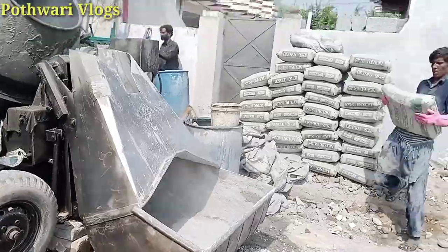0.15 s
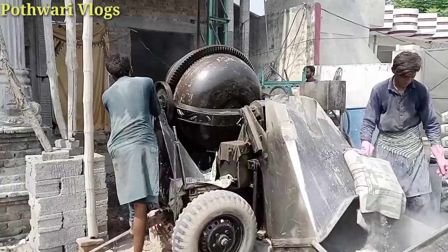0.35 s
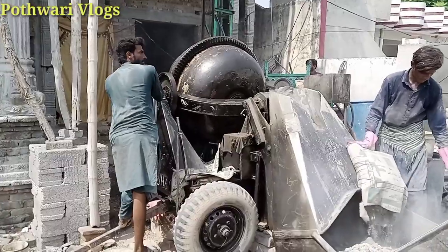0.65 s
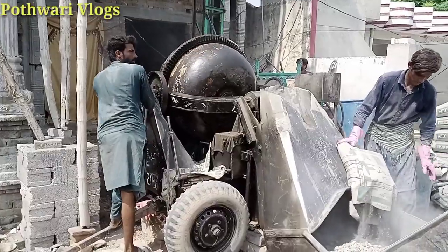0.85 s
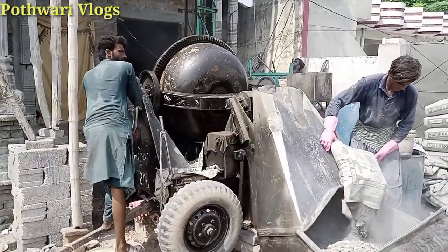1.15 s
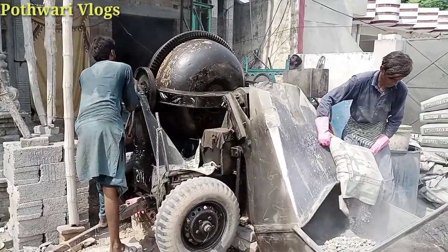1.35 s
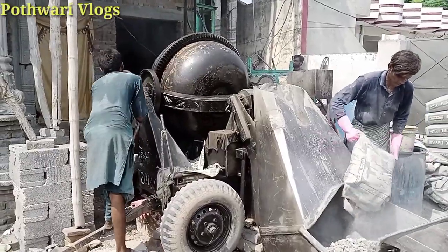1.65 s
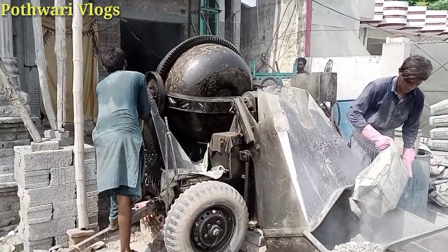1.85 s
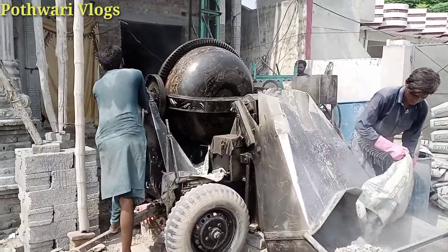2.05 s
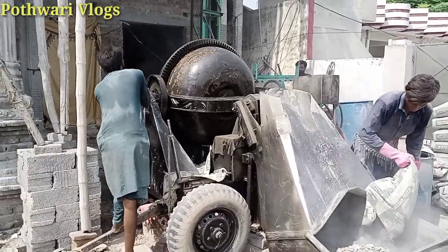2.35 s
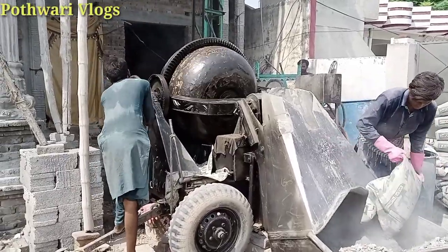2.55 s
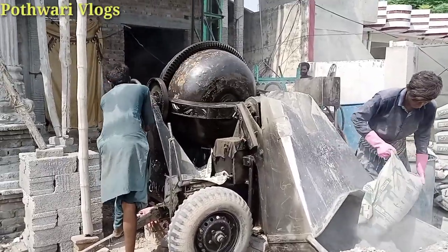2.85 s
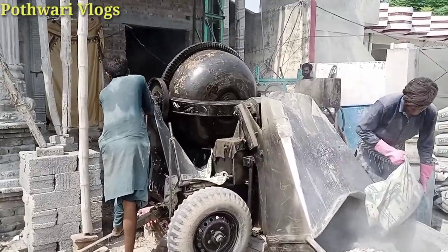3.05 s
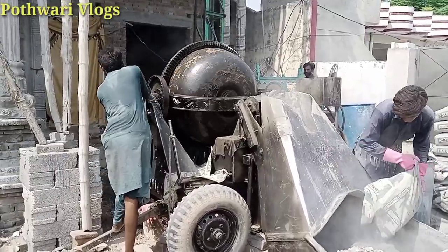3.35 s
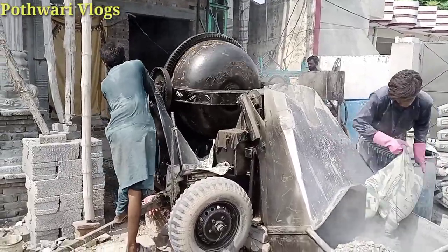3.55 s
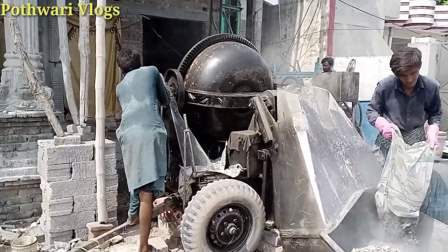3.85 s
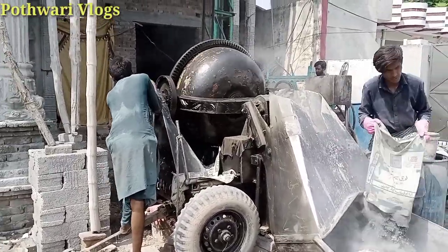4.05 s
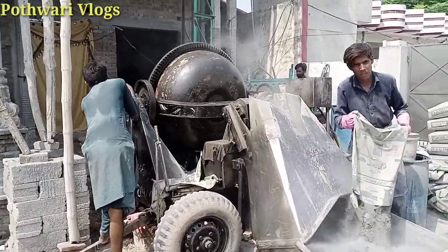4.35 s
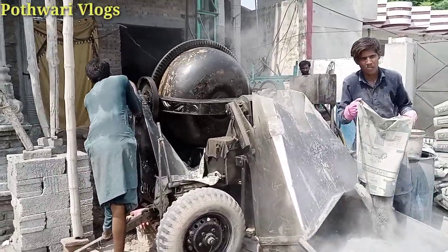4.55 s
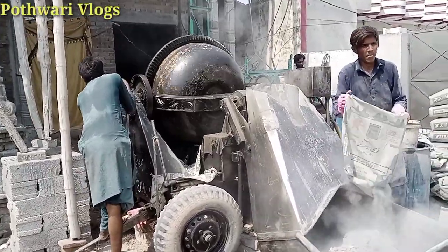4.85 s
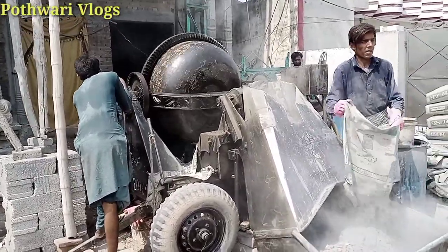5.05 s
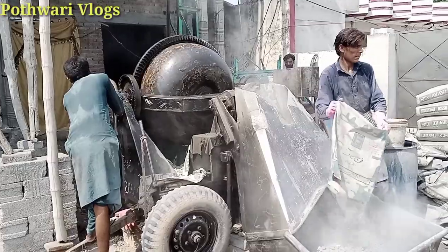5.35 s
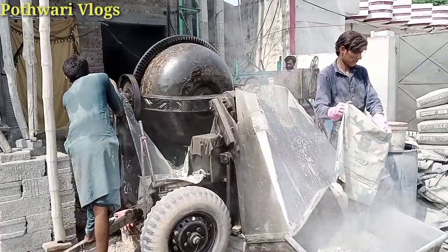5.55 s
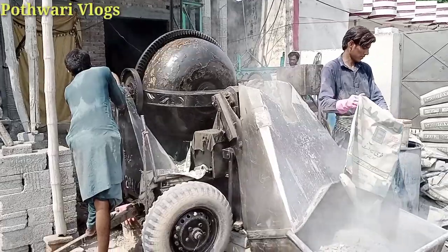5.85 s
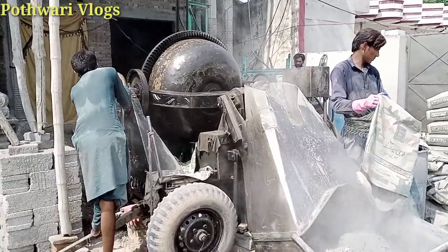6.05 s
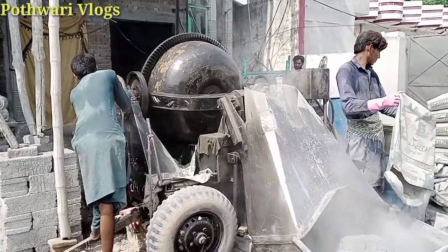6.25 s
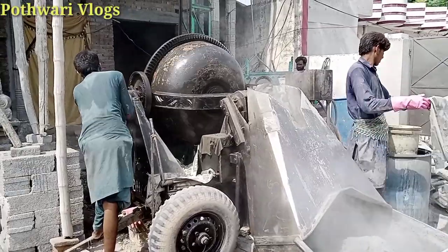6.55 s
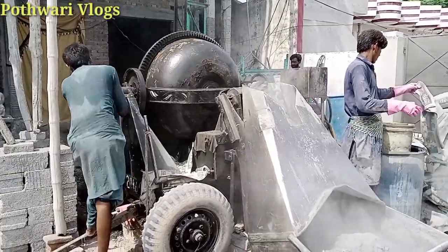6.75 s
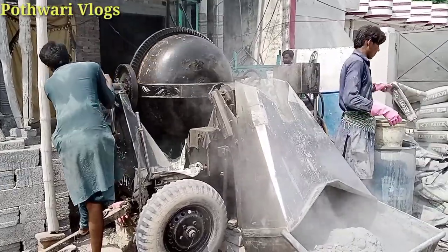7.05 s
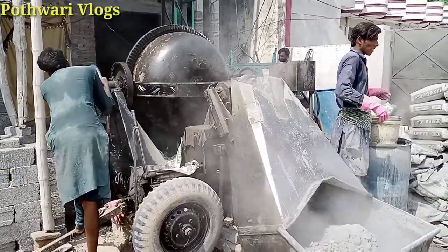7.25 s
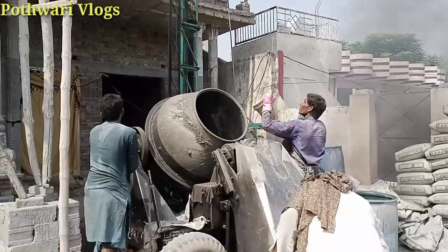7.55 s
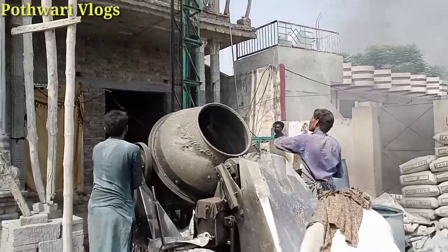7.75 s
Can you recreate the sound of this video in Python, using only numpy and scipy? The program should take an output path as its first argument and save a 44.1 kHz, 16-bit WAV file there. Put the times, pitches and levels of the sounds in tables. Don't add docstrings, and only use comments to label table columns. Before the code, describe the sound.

Steady clattering small diesel drives a concrete mixer at about ten beats a second; one load thumps into a steel hopper, and the view jumps closer at the end.

```python
import sys
import numpy as np
from scipy import signal
from scipy.fft import rfft, irfft
from scipy.io import wavfile
from scipy.ndimage import uniform_filter1d

SR = 44100
rng = np.random.default_rng(int(sys.argv[2]) if len(sys.argv) > 2 else 0)


def waveform_to_disk(signal):
    frames = np.transpose(np.atleast_2d(signal))
    scaled = np.clip(frames, -1, 1) * 32767
    samples = np.round(scaled).astype(np.int16)
    wavfile.write(sys.argv[1], SR, samples)


def rack_gain(trim_db):
    fader = np.asarray(trim_db, float)
    return 10 ** (fader / 20)


N = 348554

MOVES_S = (.41, 7.56)
# knock, treble, panel and thump level, all in dB.
POSITION_DB = [
    (-2.5, -4, 1.5, -3),
    (-1.5, 1.5, -3, 2),
    (2, 6.5, -9, 17.5),
]
# frequency in Hz, level in dB per Hz.
KNOCK_COLOUR = [(900, -21.5), (1200, -30), (1350, -5.5), (1900, -10.5), (2450, 0), (3200, -2), (3700, -5),
                (5200, -3), (7000, -3), (8000, -16), (10000, -27), (12000, -38.5), (13800, -40),
                (15000, -25)]


def rms_one(x):
    return x / np.sqrt(np.mean(x ** 2) + 1e-20)


def at_hz(points, hz):
    points_hz, points_db = np.transpose(points)
    return np.interp(np.log(hz), np.log(points_hz), points_db)


def coloured(x, spectrum):
    size = 8192
    bins_hz = np.maximum(np.arange(size // 2 + 1), 1) * SR / size
    cepstrum = irfft(np.log(rack_gain(at_hz(spectrum, bins_hz))))
    cepstrum[1:size // 2] *= 2
    cepstrum[size // 2 + 1:] = 0
    return signal.fftconvolve(x, irfft(np.exp(rfft(cepstrum))))[:N]


def drift(rate_hz):
    step = 40
    r = np.exp(-2 * np.pi * rate_hz * step / SR)
    settle = 2000
    slow = signal.lfilter([1], [1, -2 * r, r * r], rng.standard_normal(N // step + settle + 2))[settle:]
    return np.interp(np.arange(N) / step, np.arange(len(slow)), rms_one(slow))


def grains(per_s, spread_db):
    sizes = rack_gain(spread_db * np.minimum(rng.exponential(1, N), 4.0))
    sizes = sizes * rng.choice([-1, 1], N)
    return rms_one(sizes * (rng.random(N) < per_s / SR))


def clicks(seconds, sizes):
    out = np.full(N, 1e-18)
    out[np.clip((np.asarray(seconds) * SR).astype(int), 0, N - 1)] = sizes
    return out


def dying(x, t60_s):
    return signal.lfilter([1], [1, -rack_gain(-60 / (t60_s * SR))], x)


def swelling(x, rise_s):
    r = np.exp(-1 / (rise_s * SR))
    return signal.lfilter([1 - r], [1, -r], x)


def burst(x, t60_s, rise_s):
    return swelling(dying(x, t60_s), rise_s)


def ring(x, hz, width_hz):
    r = np.exp(-np.pi * width_hz / SR)
    w = 2 * np.pi * hz / SR
    return signal.lfilter([0, np.sin(w)], [1, -2 * r * np.cos(w), r * r], x)


def pings(seconds, hz, level_db, half_s):
    out, t = np.zeros(N + 800), np.arange(800) / SR
    bell = (t / half_s) ** 2 * np.exp(2 - 2 * t / half_s)
    for s, f, g in zip(np.maximum(seconds, 0), hz, rack_gain(level_db)):
        start = int(s * SR)
        out[start:start + len(t)] += g * bell * np.sin(2 * np.pi * f * t)
    return out[:N]


def band_of(x, order, low_hz, high_hz):
    return signal.sosfilt(signal.butter(order, [low_hz, high_hz], "band", fs=SR, output="sos"), x)


def gear(patchy_db):
    # frequency in Hz, level in dB per Hz.
    drum_colour = [(30, -38), (70, -9.5), (200, -7), (400, -11.5), (540, -18), (800, -8), (1150, -11.5),
                   (1350, -2), (2500, -0.5), (4000, -7), (7000, -11.5), (9000, -31.5), (12500, -50.5),
                   (15300, -36)]
    # time in seconds, level in dB, brightness in dB per octave.
    drum_run = [(0, -34, -4), (.4, -37, -5), (.6, -38.5, 1.5), (1.5, -37, -0.5), (2.2, -38, 0.5),
                (4, -38, 0), (5.5, -37, -0.5), (7.5, -37, -2), (7.6, -42.5, 10.5), (7.75, -39.5, 14.5),
                (7.9, -38.5, 13)]
    s, level_db, slope_db = np.transpose(drum_run)
    t = np.arange(N) / SR
    level_db, slope_db = np.interp(t, s, level_db), np.interp(t, s, slope_db)
    edges_hz = 30 * 2 ** np.arange(0, 9.1, 1 / 3)
    contacts = [rms_one(coloured(grains(9000, 2.6), drum_colour)) for k in range(2)]
    out = np.zeros(N)
    for k, (low_hz, high_hz) in enumerate(zip(edges_hz, edges_hz[1:])):
        band = band_of(contacts[k % 2], 2, low_hz, high_hz)
        octaves = np.clip(np.log2(low_hz / 2000), 0, 1.6)
        out += band * rack_gain(patchy_db * drift(14.1) + slope_db * octaves)
    return rack_gain(level_db) * out


def firings():
    # time in seconds, firings counted so far.
    pace = [(.012, 0), (.08, 1), (.292, 3), (.372, 4), (.4549, 5), (1.0589, 11), (1.6704, 17), (2.2889, 23),
            (2.9146, 29), (3.538, 35), (4.1604, 41), (4.787, 47), (5.4147, 53), (6.0366, 59), (6.6571, 65),
            (7.4855, 73), (7.5804, 74), (7.8535, 78)]
    # time in seconds, load in dB.
    load = [(.4, -3.5), (1.3, -2), (2.2, -0.5), (3.3, -0.36), (4.2, 0.58), (5.6, -0.5), (7.4, 0.16)]
    marks_s, counted = np.transpose(pace)
    s = np.interp(np.arange(counted[-1] + 1), counted, marks_s)
    return s, np.searchsorted(MOVES_S, s), np.interp(s, *np.transpose(load))


def singled_out(s, usual, rows, axis):
    rows, out = np.array(rows), np.array(usual)
    nearest = np.abs(s[:, None] - rows[:, 0]).argmin(axis=0)
    out[nearest] = rows[:, axis]
    return out


def panel(lead_s, rise_s, t60_s, scatter_db):
    # frequency in Hz, width in Hz, level in dB.
    panel_modes = [(717, 20.6, 3), (784, 32, -19), (874, 32, 5), (928.5, 18, -3.5)]
    # time in seconds, level in dB.
    hums = [(.455, 8.5), (.757, 12), (.858, 10), (.958, 8), (2.083, 3), (3.745, 5), (4.16, 5), (4.578, 9.5),
            (4.892, 11), (5.101, 11), (5.31, 13), (5.829, 15.5), (6.14, 9), (6.347, 16), (6.554, 8.5),
            (6.761, 3), (7.071, 2)]
    s, place, load_db = firings()
    level_db = np.array(POSITION_DB)[place, 2] + singled_out(s, 0 * s, hums, axis=1)
    chance = rng.standard_normal((len(s), len(panel_modes)))
    out = np.zeros(N)
    for k, (hz, width_hz, mode_db) in enumerate(panel_modes):
        strength = rack_gain(level_db + scatter_db * chance[:, k])
        shaken = burst(clicks(s - lead_s, strength), t60_s, rise_s) * rng.standard_normal(N)
        twice = ring(ring(shaken, hz, width_hz), hz, 1.8 * width_hz)
        out += rack_gain(mode_db) * rms_one(twice)
    return rack_gain(-52.5) * rms_one(out)


def exhaust(lead_s, rise_s, scatter_db):
    # frequency in Hz, width in Hz, level in dB, gain at the last position in dB.
    pipe_modes = [(73.6, 21, -1, 0.5), (126.5, 17, 0, -7), (202, 29, -3, -13), (345, 16, -23, 10),
                  (450, 16, -21, 9.5)]
    # time in seconds, level in dB.
    puffs = [(.958, -10), (1.161, -16), (1.98, 5), (2.497, 6.5), (2.602, 5.5), (2.706, -4), (2.81, 6),
             (3.018, 0), (3.226, -5), (3.642, 6), (3.953, 0), (4.578, -14), (4.892, 6), (5.101, 6),
             (5.31, 3), (6.037, 0.5), (6.761, -18), (7.58, -7), (7.649, -4.5), (7.717, 1.5), (7.785, -1),
             (7.853, 0), (.186, 9)]
    load_share = 0.63
    s, place, load_db = firings()
    level_db = np.array(POSITION_DB)[place, 3] + load_share * load_db
    level_db = level_db + singled_out(s, 0 * s, puffs, axis=1)
    chance = rng.standard_normal((len(s), len(pipe_modes)))
    out = np.zeros(N)
    for k, (hz, width_hz, mode_db, near_db) in enumerate(pipe_modes):
        strength = rack_gain(level_db + mode_db + near_db * (s > MOVES_S[1]) + scatter_db * chance[:, k])
        out += ring(swelling(clicks(s - lead_s, strength), rise_s), hz, width_hz)
    out = signal.sosfilt(signal.butter(2, 62, "high", fs=SR, output="sos"), out)
    return rack_gain(-52.5) * rms_one(out)


def knock_strengths(s, place, load_db, uneven):
    # time in seconds, knock in dB, treble in dB, loudest ring in Hz.
    odd_knocks = [(.079, 4.5, 6, 2320), (.757, 2.5, 6.5, 2480), (.383, -12, 4.5, 2100),
                  (1.773, -5, -3, 2950), (1.98, 1.5, 5, 3300), (2.289, 0, 3.5, 3170), (3.226, 6, 1.5, 2870),
                  (3.33, -1.5, 3, 2700), (3.538, -8, 4, 2260), (3.849, 3, -1.5, 2370),
                  (3.953, 3, 0.9, 2370), (4.16, 5, 0.5, 2700), (4.369, -2.5, -2, 2370),
                  (.012, -9, -2, 2530), (4.787, -1.5, -4.5, 2700), (4.892, 5.5, -1, 2700),
                  (5.205, 4.5, -1, 2850), (5.415, 3, 3, 2700), (.858, 4, 3, 2380), (6.037, 2, 0, 2800),
                  (6.243, 5, 3.5, 3130), (6.657, 1.5, 1.2, 3050), (6.761, 0.5, -2, 2340),
                  (6.968, -2.5, 5, 2430), (7.278, -2.5, -2.5, 2950), (7.382, 5, 1, 2780),
                  (7.486, -11, -7.5, 2400), (7.717, -0.5, 0.9, 4035), (7.785, -2, 2, 2390),
                  (7.853, -0.5, -0.7, 3660)]
    # time in seconds, level in dB.
    arrival = [(7.56, -7), (7.72, 0)]
    uneven_db, treble_load_share = 0.9, 2.56
    knock_db = load_db + singled_out(s, uneven_db * uneven[:, 0], odd_knocks, axis=1)
    treble_db = treble_load_share * load_db + singled_out(s, uneven_db * uneven[:, 1], odd_knocks, axis=2)
    treble_db += np.array(POSITION_DB)[place, 1] - knock_db
    knock_db += np.array(POSITION_DB)[place, 0]
    usual_hz = 2700 * 1.13 ** np.clip(uneven[:, 2], -1.2, 1.4)
    loudest_hz = singled_out(s, usual_hz, odd_knocks, axis=3)
    return knock_db + np.interp(s, *np.transpose(arrival), left=0), treble_db, loudest_hz


def mode_chance(firing_count, mode_count, spread_count):
    chance = rng.standard_normal((firing_count, 3, mode_count))
    chance = 0.77 * chance + 0.57 * uniform_filter1d(chance, size=5, axis=2)
    spread = chance[:, :, :spread_count]
    chance[:, :, :spread_count] -= uniform_filter1d(spread, size=25, axis=2)
    return np.clip(chance, -2.5, 1.9)


def short_pings(s, tick_lead_s, place, knock_db, treble_db, loudest_hz, valve_hz, uneven):
    knock_db = knock_db - 12 * (place == 0)
    ping_db = -26 + knock_db + treble_db + at_hz(KNOCK_COLOUR, valve_hz)
    ping_db = ping_db + 6 * np.clip(rng.standard_normal(len(s)), -2, 1.2)
    out = pings(s, loudest_hz, -21 + knock_db + 3.3 * uneven[:, 1], half_s=0.0017)
    out += pings(s - tick_lead_s, valve_hz, ping_db, half_s=0.0032)
    return out + pings(s - .001, valve_hz, ping_db, half_s=0.0032)


def knocks(count, tick_lead_s):
    # frequency in Hz, width in Hz, level in dB (unused: all get
    block_modes = [(1430, 120, -7), (2370, 57, -1), (2700, 52, 0), (3201, 54, -3), (3980, 190, -9),
                   (5140, 160, -7), (6480, 420, -9), (6860, 114, -8), (7600, 170, -18), (9260, 63, -22)]
    # frequency in Hz, change in dB.
    from_behind = [(1200, 13.5), (2400, 3), (4000, -0.5), (7000, -2.5), (15000, 9)]
    from_near = [(1200, -22), (1740, -16), (2000, 2), (2400, -2), (3000, -35), (3600, -11), (4010, 9.5),
                 (4400, -5), (5200, -7), (6100, -2), (7500, -4.5), (13400, 5), (15000, -1)]
    tick_by_place_db = (-57, -3.5, 1)
    rattle_by_place_db = (3, 3, 5)
    # t60 in seconds at 3 kHz, fall in octaves of time per octave of pitch.
    rattle_t60 = (0.14, 0.42)
    mode_q, scatter_db, blow_db = 100, 5.8, 21.5

    s, place, load_db = firings()
    uneven = rng.standard_normal((len(s), 3))
    knock_db, treble_db, loudest_hz = knock_strengths(s, place, load_db, uneven)
    pitches_hz = np.geomspace(1220, 15600, count) * (1 + rng.uniform(-.008, .008, count))
    modes = [(hz, hz / mode_q, 0) for hz in pitches_hz]
    modes += [(hz, 0.74 * width_hz, 3.0) for hz, width_hz, db in block_modes]
    valve_hz = rng.uniform(7900, 10300, len(s))
    rattle = rack_gain(np.array(rattle_by_place_db)[place])
    contacts = [grains(4000, 3.5) * rack_gain(2.8 * drift(105)) for k in range(3)]
    chance = mode_chance(len(s), len(modes), count)
    out = np.zeros(N)
    for k, (hz, width_hz, extra_db) in enumerate(modes):
        octave = np.log2(hz / 3000)
        colour_db = np.array([at_hz(from_behind, hz), 0, at_hz(from_near, hz)])
        share = np.clip(octave + 0.42, 0, 1)
        level_db = knock_db + share * treble_db + 6 * octave + extra_db + colour_db[place]
        level_db = level_db + 7.2 * np.exp(-(np.log(hz / loudest_hz) / 0.036) ** 2)
        main = rack_gain(level_db + scatter_db * chance[:, 0, k])

        tick_db = np.array(tick_by_place_db)[place] + 5.1 * np.clip(octave, -.4, 1)
        tick_db = tick_db + 9.0 * np.exp(-(np.log(hz / valve_hz) / .016) ** 2)
        tick = rack_gain(level_db + scatter_db * chance[:, 1, k] + tick_db)
        sharp = burst(clicks(s - tick_lead_s, tick), 0.032, .0015)

        t60_s = rattle_t60[0] * 2 ** (-rattle_t60[1] * min(octave, 1.3))
        loose = burst(clicks(s + 0.00064, main * rattle), t60_s, 0.0046)
        blow = clicks(s, rack_gain(blow_db - 0.9 * octave) * main * np.sign(chance[:, 2, k]))
        out += ring(blow + (sharp + loose) * contacts[k % 3], hz, width_hz)
    short = short_pings(s, tick_lead_s, place, knock_db, treble_db, loudest_hz, valve_hz, uneven)
    return rack_gain(-33) * rms_one(coloured(out, KNOCK_COLOUR)) + short


def walls(x):
    echoes = clicks([.011, .019, .032, .047], rack_gain([-10.5, -7.0, -9, -45]))[:SR // 10]
    dull = signal.sosfilt(signal.butter(1, 5000, fs=SR, output="sos"), x)
    return signal.fftconvolve(dull, echoes)[:N]


def blows():
    # start in seconds, level in dB, low and high edge in Hz, rise in seconds, t60 in seconds.
    noise_bursts = [
        (0.074, -31.5, 830, 1030, 0.016, 0.12),
        (.30, -33, 827, 964, 0.022, 0.13),
        (1.763, -25.5, 1220, 5940, 0.02, 0.45),
        (1.786, -32, 240, 2020, 0.01, 0.33),
        (1.84, -36, 232, 513, 0.0099, 0.22),
        (5.8, -37.5, 163, 348, 0.016, 0.13),
    ]
    out, powder = np.zeros(N), grains(5000, 2.9)
    for s, level_db, low_hz, high_hz, rise_s, t60_s in noise_bursts:
        band = band_of(powder, 4, low_hz, high_hz)
        shape = burst(clicks([s], 1), t60_s, rise_s)
        out += rack_gain(level_db) * rms_one(band) * shape / shape.max()
    return out


def hopper():
    # frequency in Hz, width in Hz, level in dB.
    hopper_modes = [(310, 27, -13), (329, 30, -2.5), (457, 42, -1.5), (638, 19, -3.5), (792, 35, -3),
                    (1070, 50, -7), (1430, 70, 2), (1744, 39, -1), (2010, 130, -6)]
    # time in seconds, level in dB.
    bounces = [
        (1.766, -3),
        (1.787, 2),
        (1.801, -1),
        (1.82, -6),
        (1.845, -13),
        (1.875, -13),
    ]
    s, level_db = np.transpose(bounces)
    chance = rng.standard_normal((len(s), len(hopper_modes)))
    out = np.zeros(N)
    for k, (hz, width_hz, mode_db) in enumerate(hopper_modes):
        hits = clicks(s, rack_gain(level_db + 6.2 * chance[:, k]))
        shaken = burst(hits, t60_s=.1, rise_s=0.0033) * rng.standard_normal(N)
        out += rack_gain(mode_db) * np.sqrt(width_hz) * ring(shaken, hz, width_hz)
    return rack_gain(-28) * out / np.abs(out).max() * 4


def scene():
    engine = knocks(count=96, tick_lead_s=0.01)
    engine += panel(lead_s=0.03, rise_s=0.0075, t60_s=0.18, scatter_db=7.5)
    engine += exhaust(lead_s=0.01136, rise_s=0.00048, scatter_db=4.5)
    near = np.arange(N) / SR > MOVES_S[1]
    echoes = walls(engine * rack_gain(-10 * near))
    mix = engine + echoes + gear(patchy_db=3.5) + blows() + hopper()
    return mix[None]


def roll_off(x):
    return signal.sosfilt(signal.butter(12, 16650, fs=SR, output="sos"), x)


def record(dry):
    rounded = .65 * np.tanh(dry / .65)
    heard = signal.sosfilt(signal.butter(2, 50, "high", fs=SR, output="sos"), rounded)
    heard = signal.sosfilt(signal.cheby2(14, 50, 15910, fs=SR, output="sos"), heard)
    return roll_off(heard)


dry = scene()
out = record(dry)
waveform_to_disk(out)
```